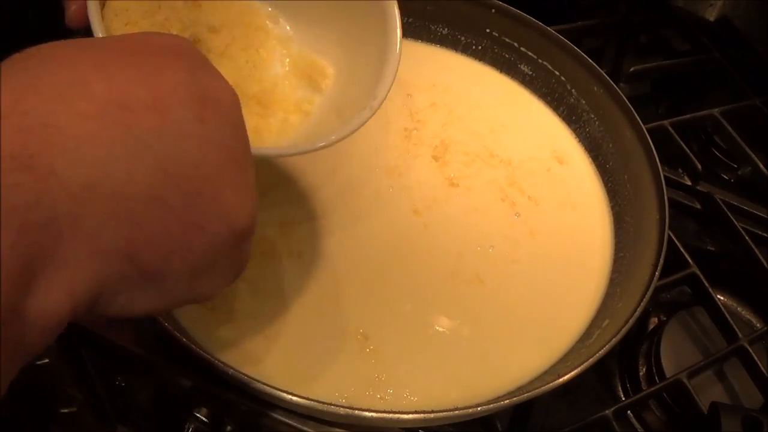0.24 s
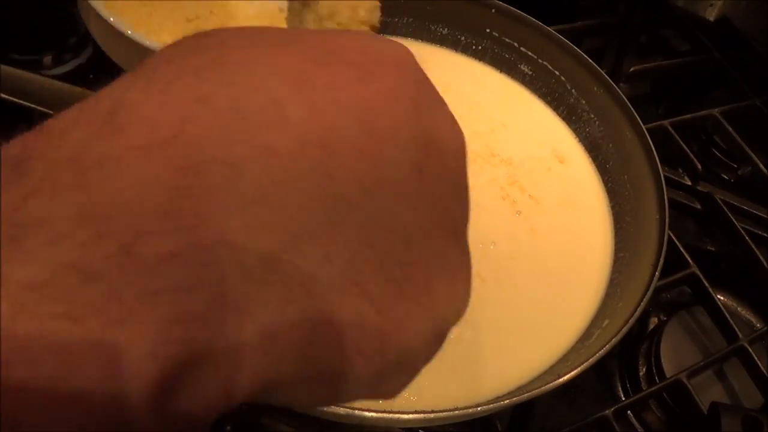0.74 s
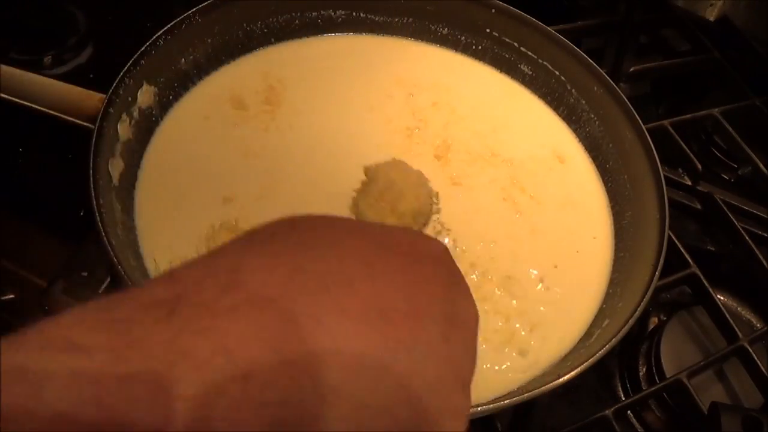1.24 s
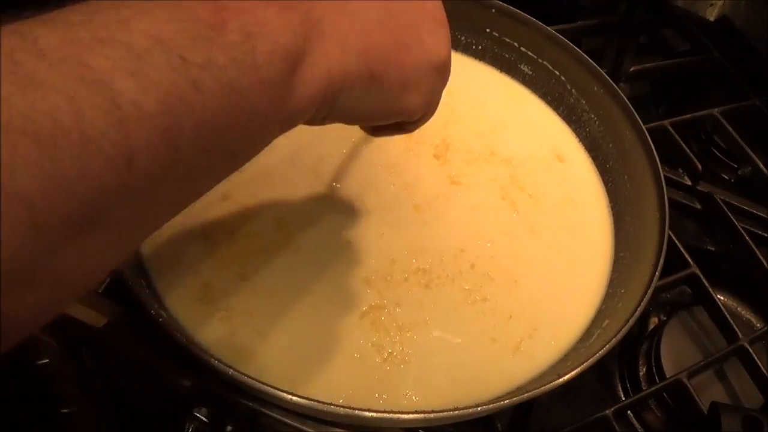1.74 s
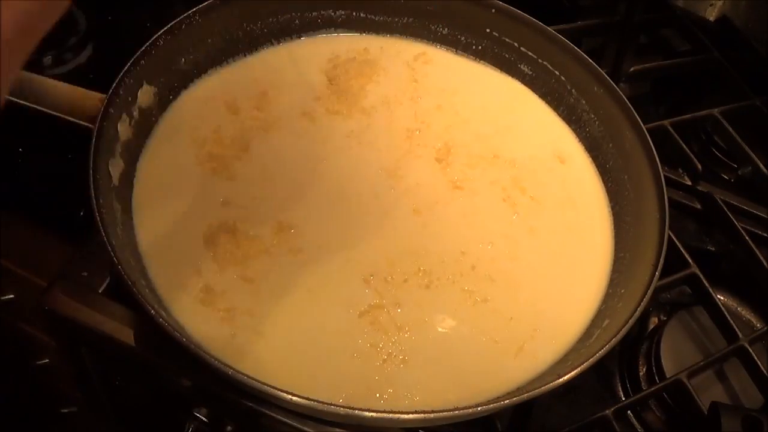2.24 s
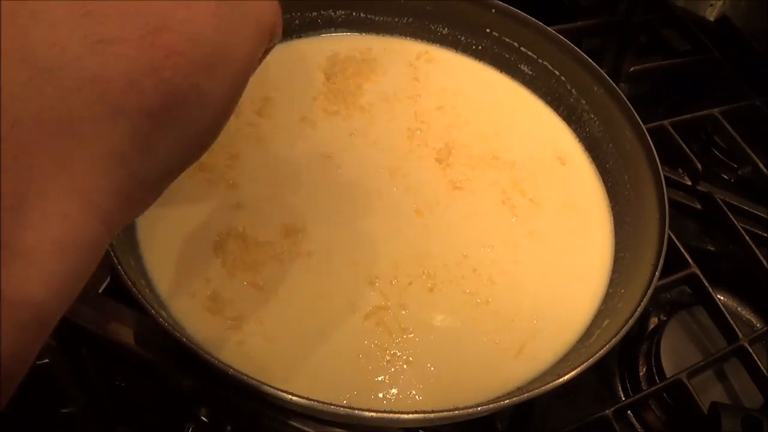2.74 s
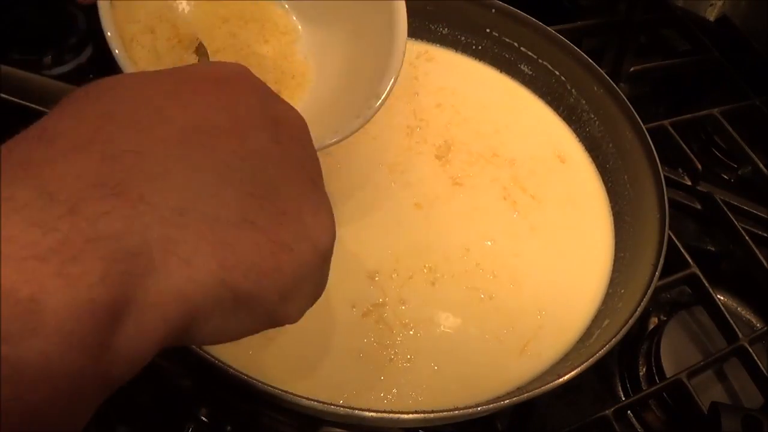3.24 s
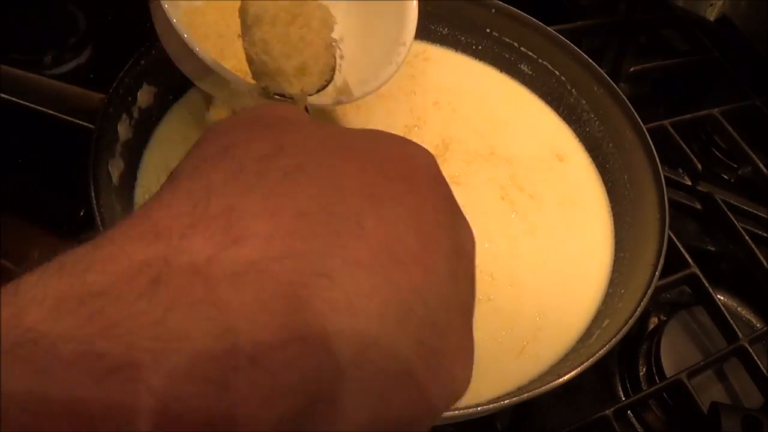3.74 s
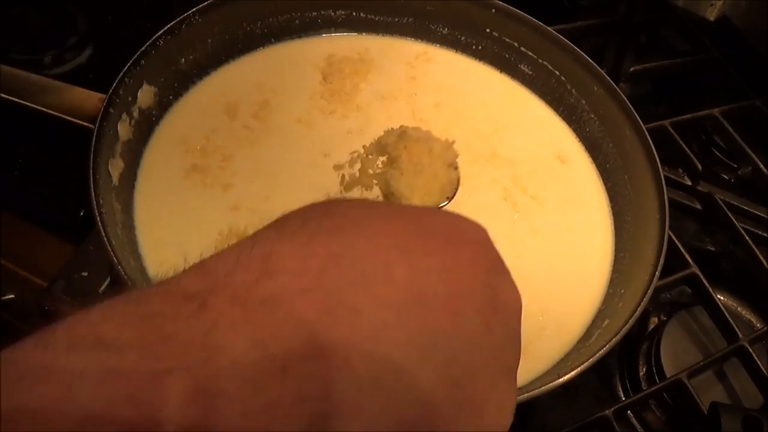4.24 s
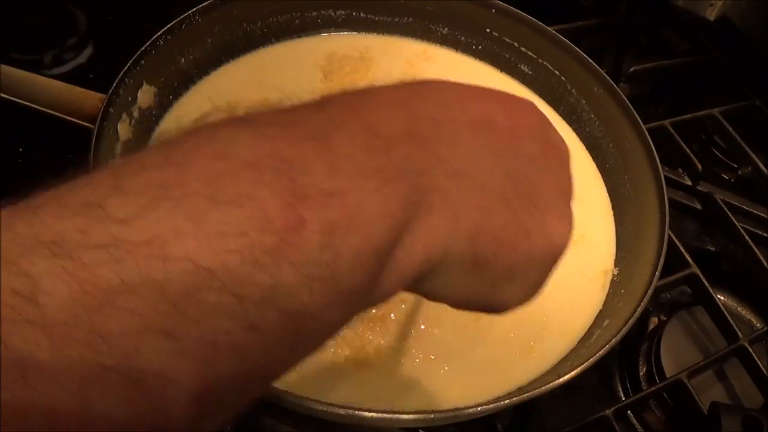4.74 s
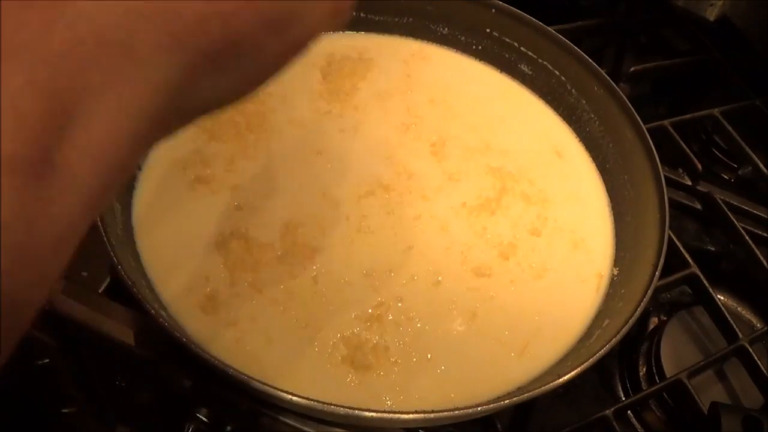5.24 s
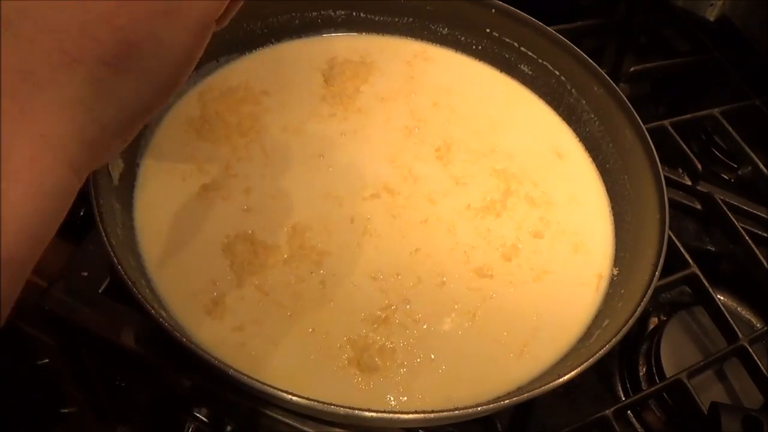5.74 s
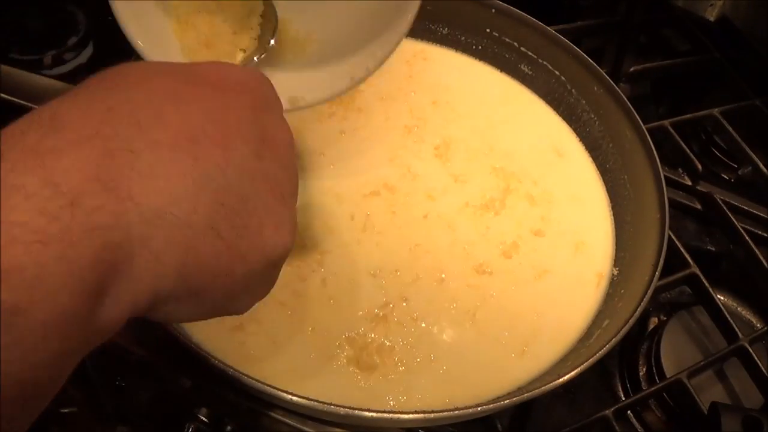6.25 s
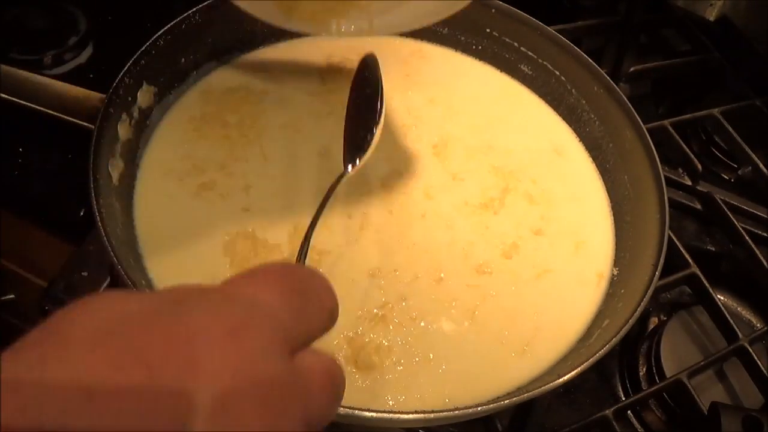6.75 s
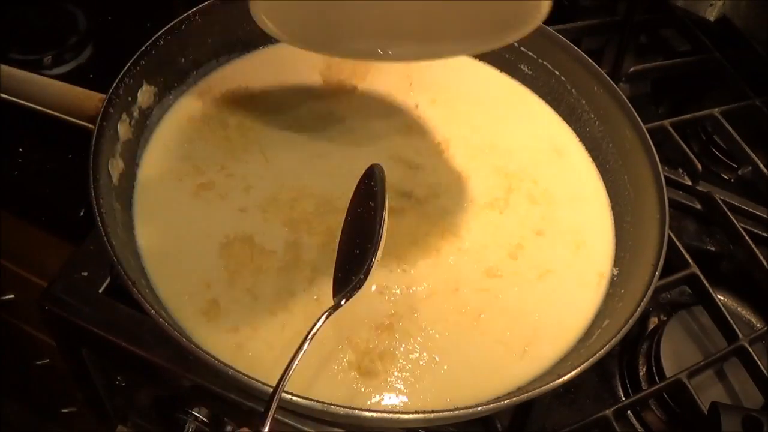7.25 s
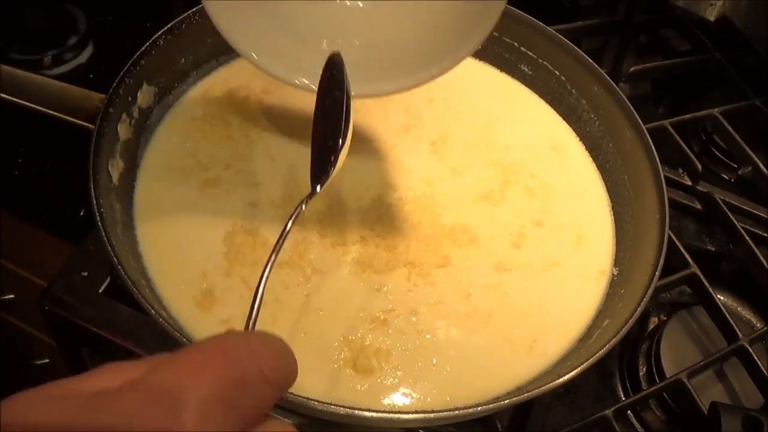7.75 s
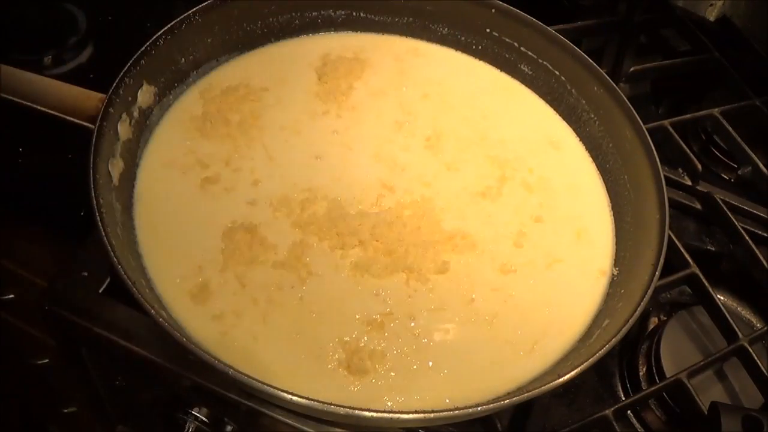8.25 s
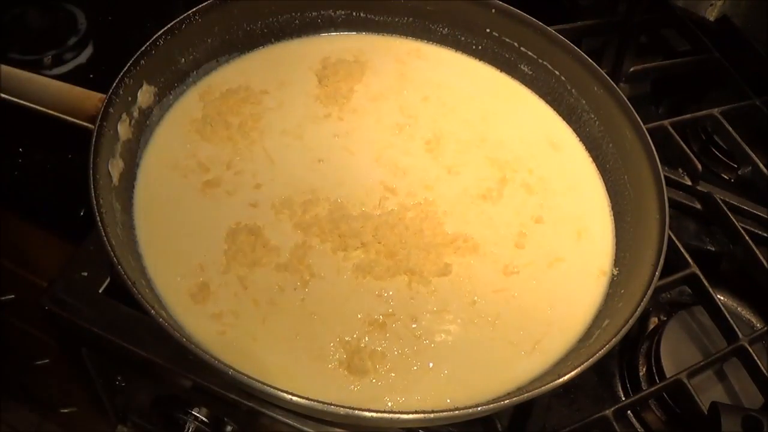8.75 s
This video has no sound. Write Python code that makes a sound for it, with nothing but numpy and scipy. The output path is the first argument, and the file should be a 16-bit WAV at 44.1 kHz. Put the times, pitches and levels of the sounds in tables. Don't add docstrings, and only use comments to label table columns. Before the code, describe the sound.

A small kitchen heard from arm's length, with quiet steady stove hiss, low hum and faint thin whines throughout. At once a spoon clinks on a ceramic bowl, three quick knocks within 0.25 s, with gritty scraping and lighter touches until 0.8. From 1.1 to 1.3 cheese crumbs tick and patter; sparse faint snaps follow. At 2.5 a bright clink, then hard knocks at 2.9 to 3.3 with small bounces, and a duller one at 3.65. Soft patter and crumb ticks run from 3.8 to 4.5, then near quiet. At 5.5 two duller clinks with low thuds, then the hardest rapid flurry at 5.9. Light touches and scraping from 6.1; a very faint rising squeak at 6.3 to 6.75. Faint rubbing and crumbs until 8.1. A hard ringing clink lands at 8.24, another at 8.68, with chattering bounces and scrapes to the end.

```python
import sys
import numpy as np
from scipy import signal
from scipy.fft import rfft, irfft
from scipy.io import wavfile
from scipy.ndimage import uniform_filter1d, minimum_filter1d

SR = 44100
rng = np.random.default_rng(int(sys.argv[2]) if len(sys.argv) > 2 else 0)


def bounce(signal):
    frames = np.transpose(np.atleast_2d(signal))
    limited = np.clip(frames, -1, 1)
    pcm = np.round(limited * 32767).astype(np.int16)
    wavfile.write(sys.argv[1], SR, pcm)


def volts_from_db(level):
    exponent = np.asarray(level, float) / 20
    return 10 ** exponent


N = 396459

COLOUR_HZ = (800, 2100, 3900, 6500, 9700)
LOW_LOSS_DB = 13
EDGE_HZ = 11105


def evened(x):
    return x / np.sqrt(np.mean(x ** 2) + 1e-20)


def read(points, hz):
    f, value = np.transpose(points)
    return np.interp(np.log(hz + 1), np.log(f + 1), value)


def add(mix, s, sound):
    sound = sound[..., round(max(-s, 0) * SR):]
    part = mix[..., round(max(s, 0) * SR):][..., :sound.shape[-1]]
    part += sound[..., :part.shape[-1]]


def band(x, lo_hz, hi_hz):
    sos = signal.butter(2, [lo_hz, min(hi_hz, .45 * SR)], "bandpass", fs=SR, output="sos")
    return signal.sosfilt(sos, x)


def hiss():
    # (frequency [Hz], level [dB per Hz])
    floor = [(12, -47), (20, 1), (239, -5), (266, -5), (295, -3), (385, -5.5), (725, -1), (944, -2),
             (1080, -2.5), (1880, -4), (2200, -3.5), (3830, -8), (11000, -14.5), (14300, -72),
             (22000, -120)]
    # (frequency [Hz], width [Hz], level [dB])
    hums = [
        (261, 110, -3),
        (1088, 14, 5),
        (2110, 25, -1),
        (2280, 30, -7),
        (5776, 20, -10),
        (4450, 130, -8.5),
        (5265, 160, -6.5),
        (10670, 2000, -12),
    ]
    # (frequency [Hz], likeness [0-1])
    likeness = [(60, 0.89), (170, 0.99), (490, 0.43), (1400, 0.43), (4010, 0.43), (11400, 0.77)]
    level_db, patchy_db, swell_db = -57, 1.4, .7

    frames, hz = N // 256 + 5, np.fft.rfftfreq(1024, 1 / SR)
    a, b, c, d, patches = rng.standard_normal((frames, 513, 5)).T
    patches = evened(uniform_filter1d(uniform_filter1d(patches, 12, 0), 14, 1))
    swell = evened(uniform_filter1d(rng.standard_normal(frames), 30))

    whines = sum(volts_from_db(db + 7.0) ** 2 / (1 + (2 * (hz - f) / w) ** 2) for f, w, db in hums)
    shape = np.sqrt(volts_from_db(read(floor, hz)) ** 2 + volts_from_db(-4.0) ** 2 * whines)
    shape *= hz < EDGE_HZ

    same = np.clip(read(likeness, hz), -1, 1)[:, None]
    left = a + 1j * b
    right = same * left + np.sqrt(1 - same ** 2) * (c + 1j * d)
    z = np.array([left, right]) * shape[:, None] * volts_from_db(patchy_db * patches + swell_db * swell)
    return volts_from_db(level_db) * evened(signal.istft(z, nperseg=1024, noverlap=768)[1][:, :N])


def held(s):
    from_s = (-1, .05, .2, .5, 2.3, 2.8, 2.9, 2.99, 3.09, 3.23, 3.5, 5.3, 5.8, 5.89, 5.93, 6.13, 8, 8.6,
              8.79, 8.93)
    # (frequency [Hz], ..)
    modes_hz = [(1180, 2110, 2800, 3960, 4050, 4130, 5410, 5570, 9970, 10680),
                (1080, 1770, 2150, 3010, 4060, 4250, 5430, 5540, 10190, 10720),
                (760, 2100, 2850, 3690, 3790, 4130, 5510, 7340, 9850, 10620), (3830, 9740, 9930, 10570),
                (1290, 2160, 2540, 3210, 3860, 4140, 6890, 7290, 9760, 10610),
                (1290, 1770, 2210, 3200, 3800, 4230, 5400, 7340, 10620, 10920),
                (1090, 1670, 2160, 2440, 3190, 3960, 4100, 4410, 5420, 6950, 9810, 10990),
                (850, 2150, 2490, 4140, 4420, 4540, 5460, 6540, 9660, 9810),
                (940, 2030, 2160, 4120, 4200, 4420, 6530, 7140, 10020, 11000),
                (1090, 1610, 2100, 4090, 2870, 3170, 3900, 5510, 6360, 7250, 10160, 10700, 10970),
                (830, 1730, 2620, 3470, 3800, 2880, 4350, 5490, 7200, 9730, 9950, 10570, 10980),
                (780, 2120, 2720, 3140, 3730, 4080, 4510, 6270, 6860, 8320, 9710, 10460, 10970),
                (830, 1850, 3840, 5480, 9790, 9950),
                (1170, 2260, 2550, 4340, 4420, 6380, 6860, 8600, 9790, 10630),
                (960, 2150, 2270, 3790, 4020, 4110, 5390, 6830, 9620, 9740), (2120, 4150, 9670),
                (830, 1480, 1690, 1820, 2130, 3220, 4110, 4190, 6850, 8360, 9560, 10500),
                (680, 2120, 2440, 3770, 3870, 4130, 4290, 5520, 6280, 7340, 7760, 8340, 9720, 9880),
                (620, 2120, 2450, 3770, 3880, 4100, 5520, 6270, 8360, 9760),
                (1280, 2020, 2090, 3620, 3920, 4100, 5620, 6890, 8350, 9890)]
    # (level [dB], ..)
    modes_db = [(-26, -5, -9, -10.5, -2.5, -3.5, -4, -16, -18, -18),
                (-15, -1, -7, -8, 2, -5, -5, -12, -8, 5), (-13, -2, -13.5, -24, -6, 0.5, -9, -11, -3, 0),
                (-11, 7, -9, 3), (-7, -17, -2, -5, 1, -6.5, -9.5, -6, -5, -9),
                (-9, -1.5, -13.5, -8, 2, -12, -8, -8, 2, -3),
                (-16, -12.5, -14, -15, -20.5, -15, 2.5, -9, -16, -1, -11.5, -20),
                (-15, -4.5, -5, -2.5, 4, -11, -13, -6, -11, 7),
                (-17, -4.5, 0.5, -4, -4, -7, -22, -11, -22, -16),
                (-3, 3, 4, 3, -3, 2, 2, 6, 1, 3, -3, 3, 2),
                (-12, -4, -5, -8, -3, -8, -10, 0, 1, 7, -7, 6, 2),
                (8, 6, -5, -9, -2.5, 2, -3, -4, 2.5, 3.5, 4.5, -2, 3), (-18, -8, -4, 0, -2, -6.5),
                (-28, 0, -7, 3, -3, -8, -14, -11, -6.5, -5), (-19, 0, -10, -9, -3, -6.5, -13, -9, -19, -10),
                (2.5, -7, -4), (-21, -12, -12, -4, -1.5, -26, -7, -13, -19, -26, -14, -24),
                (-7, 0.5, -4.5, -10, -6, 4, -10, 0.5, -6.5, -8, -20, -8.5, -6, -4),
                (-16, 2, -2, 1, -8, -5, -10, -15, -21, -4), (-15, -9, -6, -6, -1, -6, -15, -13, -11, -2)]
    # (t60 of free ring [s], free ring [dB], crack [dB], grating [dB],
    # t60 of knock [s], mode splitting [0-1], t60 of crack [s])
    grips = [(0.095, -13, -6, 1.5, 0.035, 0.02, 0.047), (0.12, -23, -2, 7, 0.035, 0.02, 0.049),
             (0.097, -10.5, -2, -0.5, 0.032, 0.01, 0.059), (.12, -13, -14, -20, .035, 0, .04),
             (0.12, -9.5, 1, -4, 0.053, 0.01, 0.063), (0.14, -2, -4, 2.5, 0.046, 0, 0.085),
             (.1, -1.5, -4.5, -1, 0.045, 0.02, 0.036), (0.12, -10.5, -2.5, 3, 0.033, 0.02, .035),
             (0.091, -5, -11, 0, 0.047, 0.02, .03), (.038, -32, -4, -8, 0.026, .015, 0.023),
             (0.1, -22, -3, -10, 0.055, .012, .04), (0.089, -10, -3, -11, 0.05, 0.02, 0.047),
             (0.089, -3.5, -8, -7, 0.029, 0.05, .035), (0.08, -7, -8.5, -7, 0.046, 0.05, 0.022),
             (0.082, -5, -6, -1, 0.028, 0.02, .03), (0.16, -5.5, 10, -17, 0.021, .02, 0.032),
             (0.24, -9.5, -2, -16, 0.048, 0.02, 0.019), (0.23, -6, -2.5, -2, 0.045, 0.05, .07),
             (.12, -4, 1, 6, .04, 0.1, .05), (.08, -8, 2, 1, 0.04, 0.03, .03)]
    high_db = (-23, -15.5, -15.5, -5, -11.5, -13.5, -11, -14, -26, -10, -10.5, -14, -6, -12, -11, -16,
               -15.5, -8, -10, -19)
    trail_db = (-30, -32, -28, -43, -21, -24, -19, -28, -30, -36, -35, -29, -24, -27, -26, -24, -23, -30,
                -30, -34)
    k = np.searchsorted(from_s, s, "right") - 1
    return modes_hz[k], modes_db[k], grips[k], high_db[k], trail_db[k]


def tinted(x, colour_db):
    hz = np.fft.rfftfreq(len(x), 1 / SR)
    valley_db = -6 * np.exp(-((hz - 8300) / 700) ** 2)
    gain = volts_from_db(read(np.transpose([COLOUR_HZ, colour_db]), hz) + valley_db)
    return band(irfft(rfft(x) * gain, len(x)), 510, 8900)


def ring(hz, db, t60, split):
    flank = np.repeat([0, -1, 1], len(hz))[:, None] * rng.uniform(.3, 1, (3 * len(hz), 1))
    hz = np.tile(hz, reps=3)[:, None] * (1 + split * flank)
    db = np.tile(db, reps=3)[:, None]
    t = np.arange(int(t60 * SR)) / SR
    t60 = t60 * np.where(hz < 1950, .3, (hz / 2100) ** -.3)
    sign = np.tile(rng.choice([-1, 1], len(db) // 3), reps=3)[:, None]
    share = np.where(abs(flank) < .2, .6, .25) * sign
    return (share * volts_from_db(db - 60 * t / t60) * np.sin(2 * np.pi * hz * t)).sum(0)


def clink(hz, db, grip, high_db, trail_db, peak_db, low_db, second_db, top_db):
    trail_tilt_db = (7, 2.5, -4, -6, -4)
    t60, free_db, crack_db, _, knock_t60, split, crack_t60 = grip
    colour_db = np.array([low_db, second_db, -6, high_db, top_db]) + 5.5

    region = np.argmin(abs(np.log(np.array(hz)[:, None] / COLOUR_HZ)), axis=1)
    region_power = np.bincount(region, volts_from_db(np.array(db)) ** 2, len(COLOUR_HZ))
    region_db = 10 * np.log10(region_power + 1e-9)
    db = db + (colour_db - region_db)[region] - LOW_LOSS_DB * (region == 0)

    t = np.arange(SR // 3) / SR
    crack = tinted(rng.standard_normal(len(t)), colour_db)
    out = volts_from_db(crack_db - 60 * t / crack_t60) * crack
    trail = tinted(rng.standard_normal(len(t)), colour_db + trail_tilt_db)
    out += volts_from_db(trail_db - 60 * t / (0.91 * t60)) * trail
    add(out, 0, volts_from_db(2.0) * ring(hz, db, knock_t60, 2 * split))
    add(out, 0, volts_from_db(free_db) * ring(hz, db, t60, split))

    snap = volts_from_db(-8.5 - 60 * t / .02) * tinted(20. * (np.arange(len(t)) == 12), colour_db)
    rise_s = np.interp(peak_db, [-35, -15], [.003, .001])
    return volts_from_db(peak_db) * (snap + out * np.minimum(t / rise_s, 1))


def stroke(hold, release, db):
    t = np.arange(0, abs(hold) + abs(release), 1 / SR)
    return volts_from_db(db - 40 * np.maximum(t - hold, 0) / abs(release)) * np.minimum(t / .003, 1)


def drag(s, hold, pressure_db, release):
    hz, db, grip, *_ = held(s)
    t60, _, _, grating_db, _, split, _ = grip
    pressure = stroke(hold, release, pressure_db)

    size, chance, side = rng.random((SR // 2, 3)).T
    force = volts_from_db(2.4 * np.minimum(-np.log(size + 1e-9), 4))
    slips = force * (chance < 1600 / SR) * np.sign(side - .5)
    slips = evened(slips)[:len(pressure)] * pressure

    body = ring(hz, db - LOW_LOSS_DB * (np.array(hz) < 1500), 0.62 * t60, 2.22 * split)
    ringing = signal.fftconvolve(slips, body / np.linalg.norm(body))
    add(ringing, 0, volts_from_db(grating_db) * tinted(slips, [0.0, 0.0, -0.5, -2, -12]))
    return s, volts_from_db(-3.0) * ringing


def ping(db, hz, t60, rise):
    t = np.arange(SR // 3) / SR
    return volts_from_db(db - 60 * t / t60) * np.sin(2 * np.pi * hz * t) * np.minimum(t / rise, 1)


def spoon():
    # (time [s], peak near 4 kHz [dB], then above that near 0.8, 2 and 10 kHz [dB, dB, dB])
    blows = [(-.002, -10.5, -27, -13, -13), (0.0654, -14, -16, -10, -6.5), (0.2253, -11, -12, -11.5, -8),
             (2.4788, -10, -17, -11.5, -1), (2.8856, -9, -7.5, -12.5, -6), (2.9063, -2, -7, -16, -13),
             (2.9938, -10.5, -9.5, -15, -9), (3.2558, -11.5, -14.5, -13, -3), (3.646, -16.5, -3, -9, -7),
             (5.5142, -18.5, -8.5, -7.5, -2.5), (5.5729, -14.5, 0, -7, -13), (5.8813, -6, -7.5, -8, -5),
             (5.8973, 1.5, -12, -9, -9.5), (5.935, -3.5, -15.5, -14, -14.5), (8.2409, -2.5, -2, -3, -12),
             (8.6796, -6, -13.5, -19, -6)]
    # (start [s], hold [s], pressure [dB], slackening by 40 dB [s])
    drags = [(0.005, 0.044, -42.5, .05), (0.088, 0.084, -57, .1), (6.152, 0.082, -57, .1),
             (0.364, 0.0033, -41, .115), (0.636, 0.082, -57, .05), (0.733, 0.0026, -41, .056),
             (2.534, 0.1, -50.5, .02), (2.926, 0.021, -27, .1), (2.994, 0.0019, -14.5, .024),
             (3.017, 0.2, -55, .02), (3.679, 0.13, -51, .03), (3.827, .02, -52, .17),
             (5.512, 0.004, -17, .14), (6.08, 0.038, -46, .03), (6.368, 0.32, -58, .1),
             (6.712, 0.0033, -49.5, .26), (8.685, 0.0018, -12, .08), (8.716, 0.0028, -24.5, .33),
             (8.897, 0.029, -42.5, .05), (8.944, 0.017, -35, .09)]
    # (time [s], peak [dB], frequency [Hz],
    # t60 [s])
    pings = [(.705, -46, 780, 0.027), (3.386, -47, 980, .03), (6.181, -35, 660, 0.021),
             (6.469, -40.5, 800, 0.033), (6.557, -48, 760, 0.033), (2.722, -49, 9700, .2),
             (.3655, -35.5, 2050, 0.082), (3.484, -38.5, 2100, 0.062), (6.1413, -27, 2170, .06),
             (6.1405, -37, 710, 0.028), (6.1945, -40, 2120, 0.08), (6.2366, -36, 2116, .04),
             (7.384, -41, 2000, 0.049), (.3655, -28.5, 3840, 0.037), (.3655, -36, 3700, 0.026),
             (.7514, -47, 3830, 0.054), (3.2979, -34, 4400, 0.023), (3.3133, -27, 4100, 0.025),
             (3.317, -36, 1980, 0.045), (3.3552, -34, 3910, 0.041), (3.7743, -37, 3800, 0.032),
             (2.541, -32.5, 2130, 0.069), (2.541, -30, 1320, 0.036), (2.541, -34, 690, 0.031),
             (5.576, -32, 8500, .06), (8.8345, -34, 2120, 0.11), (8.76, -30, 2120, 0.11),
             (8.704, -21.5, 8340, 0.13), (8.704, -24.5, 6280, 0.21), (3.0965, -27, 2100, 0.033),
             (5.912, -14.5, 2260, .06), (8.26, -15, 2133, .11), (8.264, -14, 4112, 0.2),
             (8.25, -21, 6850, 0.1), (2.908, -10.5, 4105, .16), (2.995, -14, 4140, 0.047),
             (5.574, -20, 4080, 0.06), (.228, -24, 2100, .12), (.228, -31, 5510, 0.082),
             (.068, -28, 1780, 0.059), (.068, -40, 5540, .08), (2.482, -29, 3860, 0.15),
             (5.904, -18, 6380, .08), (5.899, -12, 4345, .05), (5.936, -11, 4110, 0.079),
             (8.69, -15.5, 2120, .15), (3.648, -28, 1810, 0.05), (8.684, -21, 5520, .15),
             (8.8985, -38, 2130, .1),
             (2.482, -30, 3815, .15), (3.272, -34, 2100, .03), (3.279, -37, 3150, .05),
              (5.5155, -21, 2125, .2), (5.574, -27, 760, .05), (5.941, -21, 2140, .12),
              (8.69, -27, 6850, .15), (8.69, -27, 7760, .15), (8.69, -22, 10600, .15),
              (8.681, -26, 690, .04), (6.722, -50, 1300, .08), (6.735, -50, 850, .05),
              (7.435, -53, 1300, .06), (7.384, -52, 3800, .04), (6.364, -53, 3800, .1)]
    # (time [s], peak near 4 kHz [dB], then above that near 2 and 10 kHz [dB, dB])
    touches = [(0.3655, -29, -17, -15), (0.7164, -63, -7, 13), (0.806, -63, -4, 12), (3.272, -39, -4, -15),
               (3.096, -17, -8.5, -24), (3.1795, -37, -20, -8), (3.205, -37.5, -20, 2),
               (3.2976, -43, -14, -14), (3.3133, -42, -4, -20), (3.3557, -33.5, -11, -14),
               (3.7044, -54, -8, 12), (3.7442, -53.5, -5, 14), (3.8263, -50.5, 6, 9),
               (3.865, -55.5, -12, 11), (5.6194, -30, -6, -8.5), (6.1413, -40, -11, -9),
               (6.1947, -49, -7, -9), (6.3638, -52.5, 1, 6.5), (6.4222, -51.5, 2.5, 9.5),
               (6.7067, -55, 10.5, 7), (8.7242, -24, -36, 6.5), (8.7574, -21, -19, -15),
               (8.8014, -23.5, -18, -6), (8.9526, -26, -21, -10), (8.9442, -21.5, -17, -12.5)]

    out = np.zeros(N)
    for s, db, low_db, second_db, top_db in blows:
        add(out, s, clink(*held(s), db, low_db, second_db, top_db))
    for s, db, second_db, top_db in touches:
        add(out, s, clink(*held(s), db, second_db, second_db, top_db))
    for row in drags:
        add(out, *drag(*row))
    for s, db, hz, t60 in pings:
        add(out, s, ping(db, hz, t60, rise=.0013))
    add(out, *squeak())
    return band(out, 220, 21000)


def kitchen(x):
    # (frequency [Hz], t60 [s])
    decay = [(300, 0.49), (1000, 0.42), (3000, 0.34), (7000, 0.31), (11000, 0.23)]
    taps = np.zeros((2, SR))
    at = np.arange(120, SR - 20, 20) + rng.integers(0, 20, (2, (SR - 121) // 20))
    np.put_along_axis(taps, at, rng.choice([-1., 1.], at.shape), 1)

    hz, t, z = signal.stft(taps, SR, nperseg=256)
    dying = volts_from_db(-60 * t / read(decay, hz)[:, None])
    tail = signal.istft(z * dying, SR, nperseg=256)[1]
    tail = rfft(tail + 0.31 * tail[::-1])

    power = abs(tail) ** 2
    even = uniform_filter1d(power, size=1500) / (uniform_filter1d(power, size=30) + 1e-12)
    tail = irfft(tail * np.sqrt(even))[:, :SR // 2]
    return signal.fftconvolve(x[None], tail / np.linalg.norm(tail[0]), axes=1)[:, :N]


def cheese():
    # (start [s], length [s], patter [dB], dull rub [dB])
    patter = [(1.13, 0.13, -55.5, -62.5), (3.787, 0.34, -62, -64.5), (4.062, 0.053, -54.5, -75),
              (6.296, 0.4, -65, -59.5), (6.449, 0.031, -75, -53.5), (6.52, 0.069, -69, -58.5),
              (6.684, 0.064, -61, -56), (6.899, .45, -69.5, -65), (7.373, 0.034, -57, -53),
              (7.549, 0.071, -73, -61.5), (8.103, 0.082, -49.5, -62), (8.441, 0.24, -63, -63)]
    # (time [s], peak [dB], centre [Hz])
    crumbs = [(1.154, -34, 9780), (1.159, -30.5, 9870), (1.188, -34.5, 1660), (1.203, -31, 4180),
              (1.2194, -41, 4500), (1.227, -38, 1530), (1.662, -36, 9760), (1.889, -44, 2240),
              (3.877, -37, 6200), (3.916, -31.5, 5300), (3.974, -45, 2200), (4.004, -38, 9680),
              (4.0932, -26, 10000), (4.1903, -42, 5430), (4.3683, -42.5, 2380), (4.4894, -37, 6050),
              (4.981, -40, 5380), (7.095, -38.5, 5200), (7.232, -36, 9500), (7.572, -46, 2150)]
    pan_db = -2.5 * np.array([[.5], [-.5]])

    out, t = np.zeros((2, N)), np.arange(600) / SR
    for s, db, hz in crumbs:
        burst = rng.standard_normal(len(t)) * volts_from_db(-60 * t / 0.023)
        snap = band(burst, hz / 1.56, hz * 4.0)
        add(out, s, volts_from_db(db + pan_db) * snap / abs(snap).max())

    n = SR // 2
    for s, length, patter_db, rub_db in patter:
        swell = signal.windows.tukey(int(length * SR), .6)
        weight = volts_from_db(2.0 * np.minimum(rng.exponential(1, n), 3))
        grains = weight * (rng.random(n) < 6000 / SR) * rng.standard_normal(n)
        unrest = evened(uniform_filter1d(rng.standard_normal(n), 500))
        lumps = volts_from_db(5.3 * np.clip(unrest, -2, 1.5)) * rng.standard_normal(n)
        both = volts_from_db(patter_db) * evened(band(grains, 1100, 5200))
        both += volts_from_db(rub_db) * evened(band(lumps, 230, 1000))
        add(out, s, np.array([swell, swell]) * both[:len(swell)])
    return out


def thuds():
    # (time [s], peak [dB], frequency [Hz], t60 [s])
    pushes = [
        (1.2, -62, 205, .4),
        (5.515, -47, 210, .12),
        (5.575, -46, 330, .08),
        (5.925, -52, 45, .15),
        (8.242, -43, 200, .1),
    ]
    out = np.zeros(N)
    for s, *row in pushes:
        add(out, s, ping(*row, rise=.004))
    return out


def ticks():
    # (time [s], level [dB])
    edge_blows = [
        (2.9052, 4),
        (5.8802, 6),
        (5.8961, 8),
        (5.9338, 6),
        (8.6795, 4),
    ]
    tick_hz, tick_s = 16500, .0006
    out, t = np.zeros(N), np.arange(0, tick_s, 1 / SR)
    for s, db in edge_blows:
        add(out, s, volts_from_db(db) * np.hanning(len(t)) * np.sin(2 * np.pi * tick_hz * t))
    return out


def squeak():
    # (time [s], frequency [Hz], level [dB])
    glide = [
        (6.302, 3970, -70),
        (6.5, 4210, -64),
        (6.599, 4380, -64),
        (6.7, 4460, -66),
        (6.76, 4450, -75),
    ]
    s, hz, db = np.transpose(glide)
    t = np.arange(s[0], s[-1], 1 / SR)
    fuzz = evened(uniform_filter1d(rng.standard_normal(len(t)), 300))
    whistle = np.sin(2 * np.pi * np.cumsum(np.interp(t, s, hz)) / SR)
    return s[0], volts_from_db(np.interp(t, s, db)) * fuzz * whistle


def scene():
    near, crumbs = spoon(), cheese()
    direct = near * volts_from_db(np.array([[.1], [-.1]])) + crumbs
    room = volts_from_db(-8.5) * kitchen(near + crumbs.mean(0))
    return direct + room + hiss() + ticks() + thuds()


def roll_off(x):
    return signal.sosfilt(signal.butter(12, 12050, fs=SR, output="sos"), x)


def record(dry):
    limit_db, recover_db_per_s = -8, 4500.
    squeeze = .92
    peak_db = 20 * np.log10(abs(dry).max(0) + 1e-9)
    fall = np.arange(N) * recover_db_per_s / SR
    over_db = np.maximum(np.maximum.accumulate(peak_db + fall) - fall - limit_db, 0)
    ahead_db = -minimum_filter1d(-over_db, size=70, origin=-35)
    held_down = dry * volts_from_db(-squeeze * uniform_filter1d(ahead_db, size=20))
    edge = signal.firwin(401, EDGE_HZ, window=("kaiser", 5), fs=SR)
    return roll_off(signal.oaconvolve(held_down, edge[None], "same"))


dry = scene()
out = record(dry)
bounce(out)
```